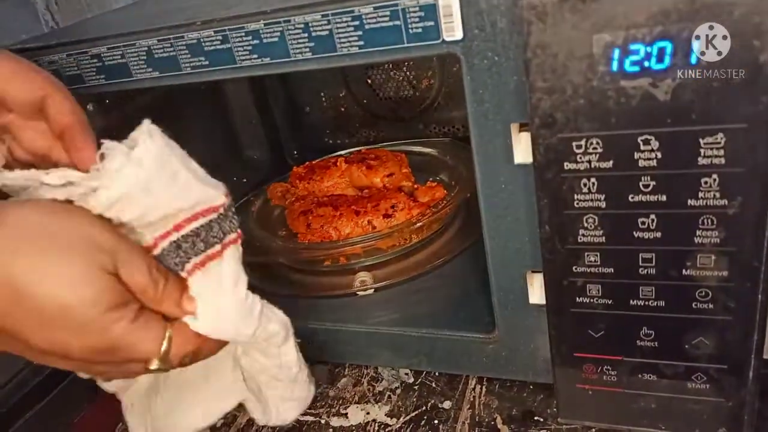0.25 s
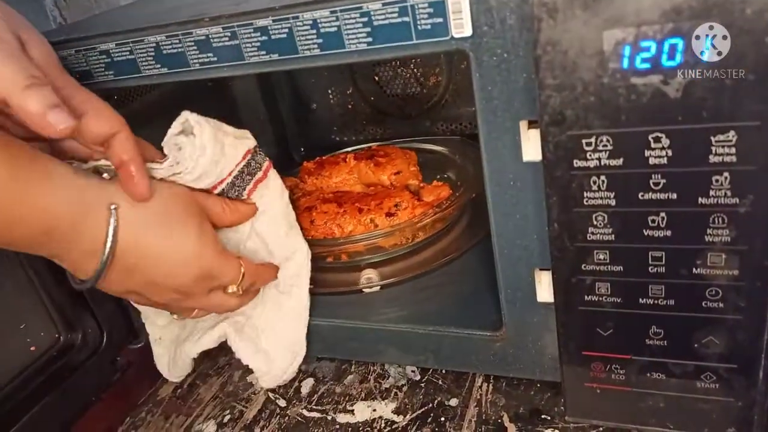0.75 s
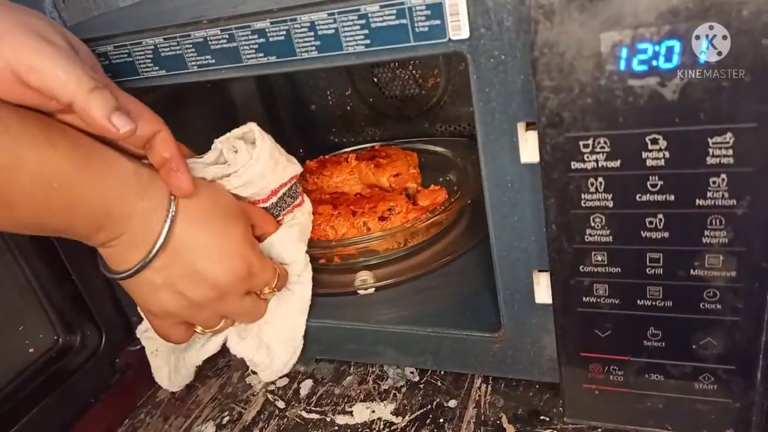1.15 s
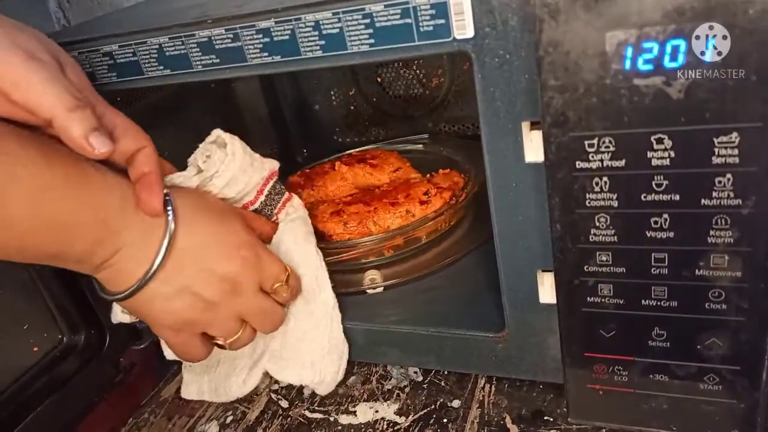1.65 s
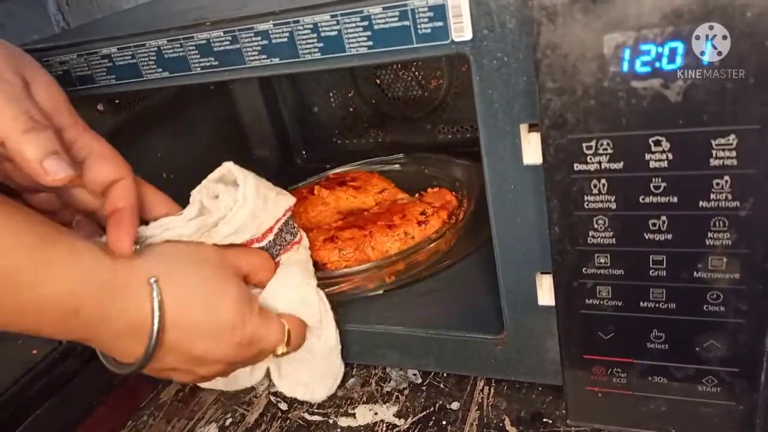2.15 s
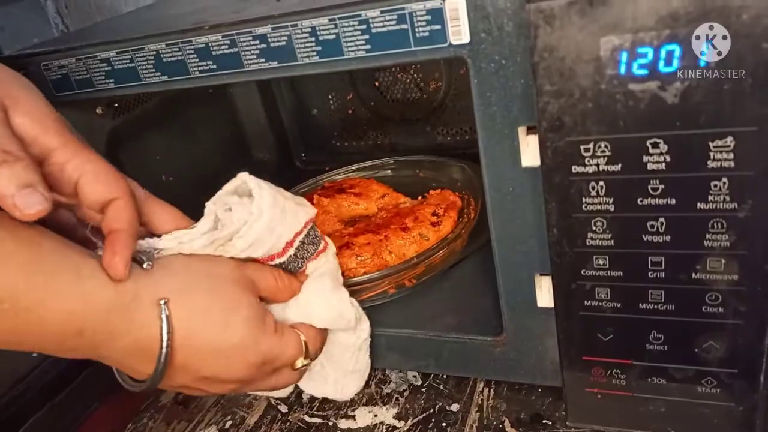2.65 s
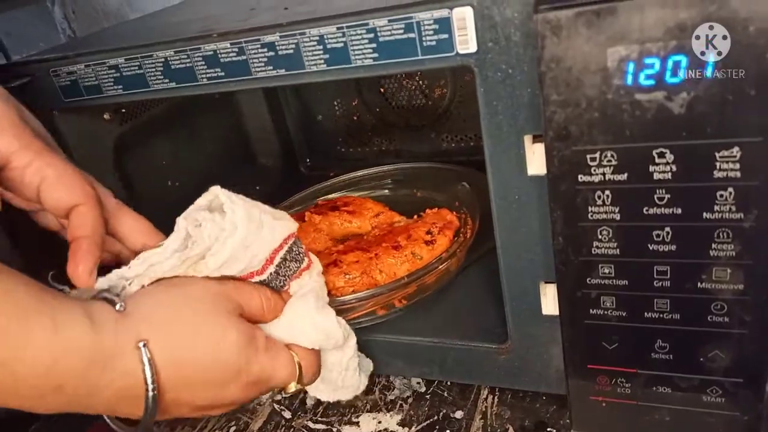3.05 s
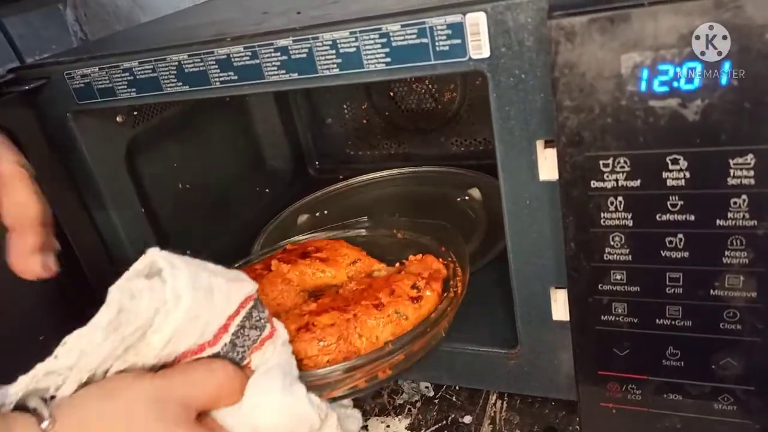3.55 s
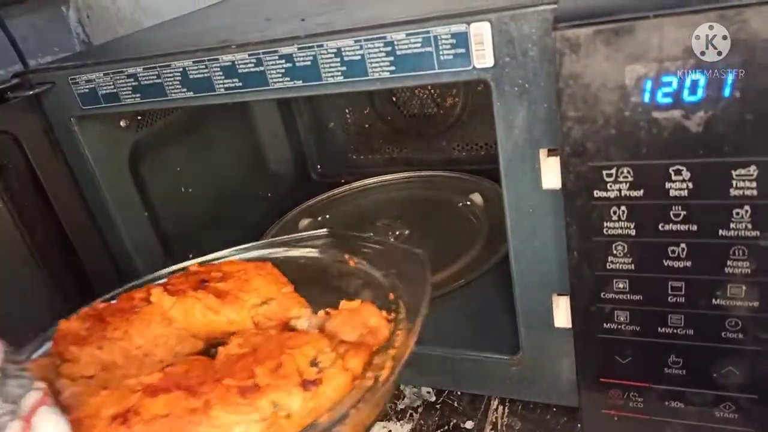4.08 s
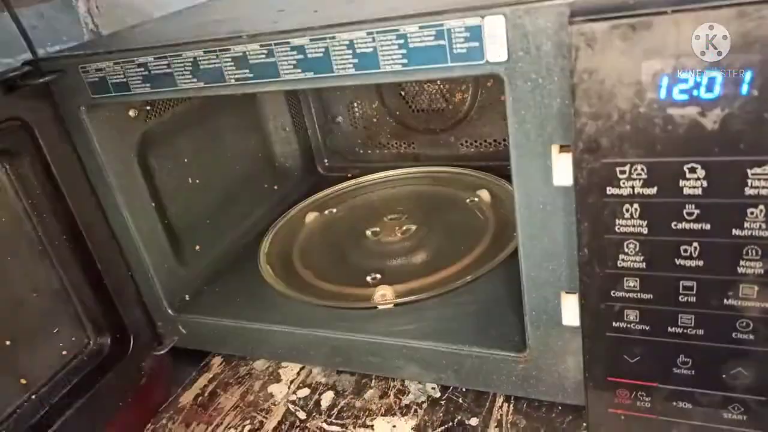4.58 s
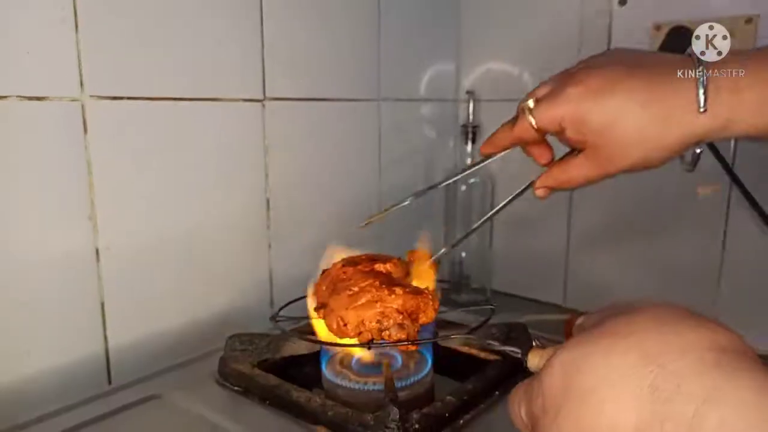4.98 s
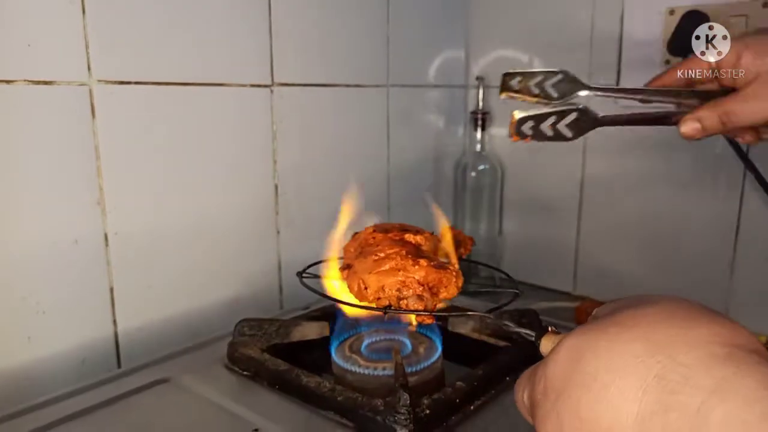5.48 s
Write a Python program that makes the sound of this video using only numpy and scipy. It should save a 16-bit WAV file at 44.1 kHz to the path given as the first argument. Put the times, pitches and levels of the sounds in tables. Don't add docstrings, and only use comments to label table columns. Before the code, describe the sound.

First a thin squeak over soft room hum, then muffled glass rubs, light clicks and low metal thumps from an oven. The dish drops with a bright double clink, slides, taps the rim and leaves. The hum continues, a tiny chirp, a fade to silence, and a nearby gas flame swells in, slightly right, low and fluttering, with small crackles of bursting fat.

```python
import sys
import numpy as np
from scipy import signal
from scipy.io import wavfile
from scipy.ndimage import uniform_filter1d

SR = 44100
rng = np.random.default_rng(int(sys.argv[2]) if len(sys.argv) > 2 else 0)


def rack_gain(trim_db):
    fader = np.asarray(trim_db, float)
    return 10 ** (fader / 20)


def master(y):
    cut = np.clip(np.atleast_2d(y).T, -1, 1)
    pcm = np.round(cut * 32767)
    wavfile.write(sys.argv[1], SR, pcm.astype(np.int16))


N = 252296
CUT_OUT, CUT_IN = 4.8205, 4.908

# frequency in Hz, level in dB, t60 in seconds.
DISH = [(508, -9.5, 0.39), (573, -2.5, 0.27), (637, 1.5, 0.04), (826, -8.5, 0.23), (1046, -12.5, 0.016),
        (1151, -0.5, 0.28), (1440, -22.5, 0.084), (1760, -6.5, .14), (1843, -6.5, 0.14), (1900, -1, 0.13),
        (2206, 2, 0.064), (2620, -5.5, .08), (3350, -28, 0.054), (3700, -9.5, 0.037), (3683, 1, 0.06),
        (4140, -7, 0.097), (4610, -11, 0.05), (5450, -20.5, .05), (6280, 3, 0.045), (7250, -9, 0.048),
        (8200, 0, 0.03)]
# frequency in Hz, likeness from -1 to 1.
SAME = [(60, 0.082), (180, 0.95), (550, 0.57), (1650, 0.044), (4970, -0.076), (15000, -0.44)]
# frequency in Hz, phase in radians.
LEAD = [(60, 0.01), (520, .3), (1220, 3), (2150, 6.1)]
HELD_S, FREE_S = 0.045, 0.071
DISH_PAN_DB, FLAME_PAN_DB = -2, -4.5


def evened(x):
    return x / np.sqrt(np.mean(x ** 2) + 1e-20)


def read(points, hz):
    f, value = np.transpose(points)
    return np.interp(np.log(hz + 1), np.log(f + 1), value)


def add(mix, s, sound, pan_db=0):
    part = mix[:, round(s * SR):][:, :len(sound)]
    part += rack_gain(np.array([[.5], [-.5]]) * pan_db) * sound[:part.shape[1]]


def add_peak(mix, s, db, sound, pan_db=0):
    add(mix, s, rack_gain(db) * sound / abs(sound).max(), pan_db)


def high_pass(x, order, hz):
    return signal.sosfilt(signal.butter(order, hz, "high", fs=SR, output="sos"), x)


def resonate(x, hz, width):
    turn = np.exp(2j * np.pi * np.cumsum(hz * np.ones(len(x))) / SR)
    r = np.exp(-np.pi * width / SR)
    return 2 * (turn * signal.lfilter([1 - r], [1, -r], x / turn)).real


def resonate_twice(x, hz, width):
    return resonate(resonate(x, hz, width), hz, width)


def treble(x):
    return signal.sosfilt(signal.butter(2, [2300, 6000], "band", fs=SR, output="sos"), x)


def stroke(t, length, rise, fall):
    return np.clip(t / rise, 0, 1) * np.exp(-np.maximum(t - length, 0) / fall)


def contact(ms, rise_ms=0.42):
    t = np.arange(SR // 8) / SR
    envelope = (1 - np.exp(-1000 * t / rise_ms)) * np.exp(-1000 * t / max(ms, .2))
    return rng.standard_normal(len(t)) * envelope


def ring(modes, longest):
    split, twin_db = .035, -12.5
    t = np.arange(SR // 3) / SR
    out = 0
    for hz, db, t60 in modes:
        pair = np.sin(2 * np.pi * hz * t) + rack_gain(twin_db) * np.sin(2 * np.pi * hz * (1 - split) * t)
        out = out + rack_gain(db - 60 * t / min(t60, longest)) * pair
    return out


def wash(spectrum, db, alike, lead, patchy_db, flicker_db):
    frames, hz = N // 256 + 5, np.fft.rfftfreq(1024, 1 / SR)
    a, b, c, d, patches = rng.standard_normal((frames, 513, 5)).T
    patches = uniform_filter1d(patches, size=10, axis=0)
    patches = evened(uniform_filter1d(patches, size=12, axis=1))
    flicker = evened(uniform_filter1d(rng.standard_normal(frames), size=4))
    same = np.clip(read(alike, hz), -1, 1)[:, None]
    late = np.exp(-1j * read(lead, hz))[:, None]
    left = a + 1j * b
    right = same * late * left + np.sqrt(1 - same ** 2) * (c + 1j * d)
    gain_db = read(spectrum, hz)[:, None] + patchy_db * patches + flicker_db * flicker
    z = np.array([left, right]) * rack_gain(gain_db)
    return rack_gain(db) * evened(signal.istft(z, nperseg=1024, noverlap=768)[1][:, :N])


def apart(x, size):
    return np.array([np.roll(x[0], size), x[1]])


def room(x):
    # frequency in Hz, t60 in seconds.
    decay = [(200, 0.52), (600, 0.41), (1500, .3), (4000, 0.23), (8000, 0.16)]
    taps = np.zeros((2, SR // 2))
    slots = np.arange(60, SR // 2 - 20, 20)
    at = slots + rng.integers(0, 20, (2, (SR // 2 - 61) // 20))
    np.put_along_axis(taps, at, rng.choice([-1., 1.], at.shape), 1)
    hz, t, z = signal.stft(taps, SR, nperseg=256)
    same = np.clip(read(SAME, hz), -1, 1)[:, None]
    z = np.array([z[0], same * z[0] + np.sqrt(1 - same ** 2) * z[1]])
    z = z * rack_gain(-60 * t / read(decay, hz)[:, None])
    tail = signal.istft(z, SR, nperseg=256)[1]
    return signal.fftconvolve(x, tail / np.linalg.norm(tail[0]), axes=1)[:, :N]


def kitchen():
    # frequency in Hz, level in dB per Hz.
    spectrum = [(30, -44.5), (57, -27), (97, -8.5), (133, -5), (166, -19.5), (204, -7), (479, -12.5),
                (1249, -18), (2299, -28.5), (6099, -34.5), (6549, -26.5), (6999, -33), (8499, -36.5),
                (15499, -35)]
    # frequency in Hz, likeness from -1 to 1.
    alike = [(60, .95), (270, .9), (500, .75), (1200, .4), (2200, .28), (4000, .05)]
    # time in seconds, level in dB.
    drift = [(0, -0.7), (4.6, -1.07)]
    drift_db = np.interp(np.arange(N) / SR, *np.transpose(drift))
    return wash(spectrum, -44.5, alike, LEAD, 0.34, 0.56) * rack_gain(drift_db)


def hinge():
    # start in seconds, length in seconds, slips a second, glide in Hz per second, level in dB.
    squeaks = [
        (0, .197, 1166, -70, -47),
        (4.661, .016, 1772, 500, -47),
    ]
    overtones = [
        [2.5, 1, -7.5, -13.5, -16.5, -20],
        [9, 0, -4, 1.5, -23, -20],
    ]
    rasp_db = [-30, 5]
    out = np.zeros((2, N))
    for (s, length, hz, glide, db), levels, hiss_db in zip(squeaks, overtones, rasp_db):
        t = np.arange(0, length + .04, 1 / SR)
        wander = uniform_filter1d(rng.standard_normal((7, len(t))), size=220)
        wander = [evened(v) for v in uniform_filter1d(wander, size=220)]
        turns = np.cumsum((hz + glide * t) * (1 + .004 * wander[-1])) / SR
        tone = 0
        for k, level_db in enumerate(levels):
            waver_db = (1.3 + .8 * k) * wander[k]
            tone = tone + rack_gain(level_db + waver_db) * np.cos(2 * np.pi * ((k + 1) * turns + rng.random()))
        hiss = rack_gain(hiss_db) * np.diff(rng.standard_normal(len(t) + 1))
        add(out, s, rack_gain(db + 5.0) * (tone + hiss) * stroke(t, length, rise=.006, fall=.008), -1)
    return out


def drags():
    # start in seconds, length in seconds, pressure in dB, centre of the rasp in Hz, grit in dB.
    slides = [
        (0.199, 0.1, -43.5, 1080, 3),
        (1.446, 0.12, -42, 740, -31),
        (2.124, 0.12, -38.5, 810, -12),
        (2.226, 0.039, -26, 840, -31),
        (2.44, 0.276, -46.5, 594, -15),
        (2.988, 0.17, -40, 990, -15.5),
        (3.187, 0.077, -37.5, 750, -29),
    ]
    press, ease_db, sag = 0.2, -10, 0.2
    out, body = np.zeros((2, N)), ring(DISH, HELD_S)
    for s, length, db, hz, grit_db in slides:
        u = np.arange(0, 1, 1 / (SR * length))
        ticks = rng.standard_normal(len(u)) * (rng.random(len(u)) < 3000 / SR)
        rasp = evened(resonate(ticks, hz * (1 - sag * u), 0.49 * hz))
        grit = evened(resonate(ticks, 1700, 1700))
        pressure = np.minimum(u / press, 1) * rack_gain(db + ease_db * np.maximum(u - press, 0) ** 2)
        scrape = (rasp + rack_gain(grit_db) * grit) * pressure * signal.windows.tukey(len(u), .2)
        rung = signal.fftconvolve(scrape, body) / np.linalg.norm(body)
        add(out, s, rack_gain(-10) * scrape, DISH_PAN_DB)
        add(out, s, rack_gain(-13) * rung, DISH_PAN_DB)
    return out


def thuds():
    # start in seconds, peak in dB, frequency in Hz.
    pushes = [(0.227, -36.5, 227), (0.259, -43, 227), (0.939, -39.5, 245), (1.178, -32.5, 266),
              (1.509, -33, 237), (1.546, -46, 210), (1.806, -31, 249), (1.838, -37.5, 233),
              (1.954, -28, 213), (2.002, -32.5, 266), (2.028, -42.5, 288), (2.238, -30, 254),
              (2.294, -25.5, 248), (2.329, -26.5, 250), (2.498, -40, 236), (3.063, -36, 241),
              (3.201, -36, 211), (3.481, -39.5, 248)]
    out = np.zeros((2, N))
    for s, db, hz in pushes:
        boom = resonate(resonate(contact(16), hz, 80), hz, 45)
        add_peak(out, s, db, boom)
    return out


def knocks(rows, modes, crack_db, wide_db, longest, pan_db):
    out, body = np.zeros((2, N)), ring(modes, longest)
    for s, db, hz, bright_db, ms in rows:
        chatter = contact(ms, 0.25 * ms)
        spot = evened(resonate_twice(chatter, hz, 0.5 * hz))
        wide = evened(resonate_twice(chatter, 1300, 2000))
        blow = spot + rack_gain(wide_db) * wide + rack_gain(bright_db) * evened(treble(chatter))
        blow = high_pass(blow, 2, 300)
        add_peak(out, s, db, signal.fftconvolve(blow, body), pan_db)
        add_peak(out, s, db + crack_db, blow, pan_db)
    return out


def dish_knocks():
    # start in seconds, peak in dB, main ring in Hz, brightness in dB, contact in ms.
    blows = [(0.907, -29.5, 2020, -4.5, 6.9), (0.91, -36.5, 860, -21, 6.6), (1.163, -29, 740, -6, 6.7),
             (1.453, -33.5, 790, -20, 16), (1.468, -31, 1900, -2, 3), (1.481, -31, 3100, -4, 2.4),
             (1.513, -40, 789, -11, 5.6), (1.76, -39.5, 797, -12, 12.6), (1.949, -30.5, 835, -19, 4.3),
             (2.006, -42, 845, -3.5, 5.3), (2.201, -34.5, 683, -16, 2.5), (2.612, -40.5, 557, -11, 1.1)]
    return knocks(blows, DISH, 3.8, -5.3, HELD_S, DISH_PAN_DB)


def clink():
    # start in seconds, peak in dB, contact in ms.
    bounces = [
        (2.236, -26.5, 5.4),
        (2.2738, -1, 2.95),
        (2.2789, -3.5, 3.5),
        (2.304, -29, 4.7),
        (2.332, -28, 10),
    ]
    # frequency in Hz, level in dB per Hz.
    crash_colour = [(180, -38), (300, -24.5), (718, -5), (780, -6), (1160, -11.5), (1260, -17),
                    (1720, -7.5), (3110, -14), (3440, -9.5), (6200, -11), (8230, -6), (10400, -65),
                    (11600, -16.5), (13800, -46.5), (15400, -54)]
    pan_db = 2.5
    hz = abs(np.fft.fftfreq(4096, 1 / SR))
    log_gain = np.log(rack_gain(np.maximum(read(crash_colour, hz), -80)))
    colour = np.fft.ifft(np.exp(np.conj(signal.hilbert(log_gain)))).real[:1024]
    out, body = np.zeros((2, N)), ring(DISH, FREE_S)
    for s, db, ms in bounces:
        crash = signal.fftconvolve(contact(ms), colour)
        add_peak(out, s, db, crash, pan_db)
        add_peak(out, s, db - 4, signal.fftconvolve(crash, body), pan_db)
    return out


def rim_taps():
    # start in seconds, peak in dB, main ring in Hz, brightness in dB, contact in ms.
    taps = [
        (3.021, -37, 1780, -20, 1.9),
        (3.055, -38.5, 1770, -10, 3.9),
        (3.074, -32.5, 1760, -15, 2.2),
        (3.096, -39.5, 1780, -13.5, 3.1),
        (3.111, -36, 1650, -23, 1.8),
        (3.198, -34, 1420, -25, 1.5),
        (3.232, -37, 1430, -24, 2.1),
        (3.2455, -27.5, 1580, -5.5, 2.5),
    ]
    rim_tap = [
        (3.3025, -18, 1310, -23, 2.6),
    ]
    last_tap = [
        (3.469, -18.5, 920, -12, 3.9),
        (3.502, -28, 1750, -25, 0.91),
        (3.515, -33.5, 870, -26, 2.9),
    ]
    # frequency in Hz, level in dB, t60 in seconds.
    rim = [(501, -36, 0.11), (628, -3, .1), (1270, 4, 0.041), (1530, -19, 0.043), (1780, -0.5, 0.086),
           (1960, 4, 0.04), (2395, -8, 0.09), (3070, -7, .07), (3800, -16, .05), (4609, -2, 0.066),
           (5370, 0, .05)]
    lip = [(650, -25, 0.13), (885, 1.5, .09), (1260, -27, 0.02), (1850, -5.5, 0.061), (2080, -15, 0.021),
           (2490, 0, 0.032), (3140, -3, 0.033), (4750, -10, .04), (5350, 7, 0.04), (6340, -4, 0.076),
           (7580, -4.5, 0.054)]
    pan_db = -7.5
    out = knocks(taps, DISH[5:], 0.67, -8, 0.22 * HELD_S, pan_db)
    out = out + knocks(rim_tap, rim, -21, 9.2, FREE_S, pan_db)
    return out + knocks(last_tap, lip, -1.3, 0.93, FREE_S, pan_db)


def turntable(x):
    # frequency in Hz, level in dB, t60 in seconds.
    plate = [(480, -21, 0.81)]
    t = np.arange(SR // 2) / SR
    body = sum(rack_gain(db - 60 * t / t60) * np.sin(2 * np.pi * hz * t) for hz, db, t60 in plate)
    return signal.fftconvolve(x, body[None] / 20, axes=1)[:, :N]


def flutter():
    hz = 111.2
    noise = evened(resonate(resonate(rng.standard_normal(N), hz, 31), hz, 30))
    return evened(.6 * noise + np.cos(2 * np.pi * hz * np.arange(N) / SR))


def crackles():
    # start in seconds, peak in dB, frequency in Hz, body in dB.
    bursts = [
        (5.0085, -35, 3920, 1),
        (5.04, -29, 7240, -18),
        (5.066, -29, 3200, -5),
        (5.1702, -26, 3160, 2),
        (5.1953, -31.5, 3220, -9),
        (5.2536, -31, 8350, -20),
        (5.2786, -31, 3700, -20),
        (5.304, -29, 3570, 1),
        (5.6245, -33.5, 6500, -4),
    ]
    out = np.zeros((2, N))
    for s, db, hz, body_db in bursts:
        burst = contact(1.5)
        snap = evened(treble(burst)) + 2.1 * evened(resonate(burst, hz, 1300))
        body = evened(resonate(burst, 910, 360))
        add_peak(out, s, db, snap + rack_gain(body_db + 6.5) * body, FLAME_PAN_DB)
    return out


def moan():
    breath = (5.4, .3, 318, -55)
    s, length, hz, db = breath
    t = np.arange(N) / SR - s
    tone = evened(resonate_twice(rng.standard_normal(N), hz, 30))
    return rack_gain(db) * tone * stroke(t, length, rise=0.039, fall=0.036)


def stove():
    # frequency in Hz, level in dB per Hz.
    burner = [(30, -29), (55, -17.5), (95, -9), (200, -5.5), (330, -9.5), (600, -12.5), (1500, -18.5),
              (3800, -18.5), (6500, -17.5), (8500, -16), (9500, -10), (11000, -36), (11600, -12),
              (15500, -12.5)]
    # time in seconds, flare from 0 to 1.
    flame = [
        (4.95, 0.2),
        (5.05, 0.38),
        (5.2, 1.0),
        (5.32, 0.74),
        (5.42, 0.4),
        (5.72, 0.55),
    ]
    flare = np.interp(np.arange(N) / SR, *np.transpose(flame))
    roar = wash(burner, -40, SAME, LEAD[:1], 0.76, 1.0) * rack_gain(4 * flare)
    beating = rack_gain(-61 + 18 * flare) * flutter()
    pops = crackles()
    return roar + beating + moan() + pops + rack_gain(0.5) * room(pops)


def fade():
    out_s, left_at_cut, in_s, in_power = 0.11, 0.19, 0.12, 2.75
    t = np.arange(N) / SR
    down = np.clip(left_at_cut + (CUT_OUT - t) / out_s, 0, 1) * (t < CUT_OUT)
    return down + np.clip((t - CUT_IN) / in_s, 0, 1) ** in_power


def scene():
    t = np.arange(N) / SR
    air, squeak = kitchen(), hinge()
    dish = apart(drags() + dish_knocks(), size=4)
    shell = thuds()
    drop = apart(clink(), size=-3)
    rim = apart(rim_taps(), size=-5)
    oven = rack_gain(-3.5) * apart(squeak, size=-2) + rack_gain(-5) * room(squeak)
    oven = oven + rack_gain(-2.0) * dish + rack_gain(-4.0) * room(dish)
    oven = oven + shell + rack_gain(-8.5) * room(shell)
    oven = oven + drop + rack_gain(-4.5) * room(drop)
    oven = oven + rack_gain(-1.0) * rim + rack_gain(-8.5) * room(rim) + turntable(rim)
    return (oven + air) * (t < CUT_OUT) + stove() * (t > CUT_IN)


def roll_off(x):
    return signal.sosfilt(signal.butter(12, 16460, fs=SR, output="sos"), x)


def record(dry):
    edges_hz = [4750, 6100, 8520, 11020, 11560, 15470]
    steps_db = [-0.5, -6.5, -1, -15.5, -53.5, -10, -62.5]
    ceiling = 1.1
    heard = high_pass(ceiling * np.tanh(dry / ceiling), 3, 65)
    hz, at, z = signal.stft(heard, SR, nperseg=1024)
    band = np.searchsorted(edges_hz, hz)
    luck = evened(uniform_filter1d(rng.standard_normal((65, len(at))), size=4))
    luck = luck.repeat(8, axis=0)[:len(hz)]
    needed = 1.4 - 2.6 * (hz[:, None] / 8520 - 1) / .3
    lost = (band == 3)[:, None] & (luck > needed)
    z = z * rack_gain(np.array(steps_db))[band, None] * ~lost
    banded = signal.istft(z, SR, nperseg=1024)[1][:, :N]
    return roll_off(banded * fade())


dry = scene()
out = record(dry)
master(out)
```